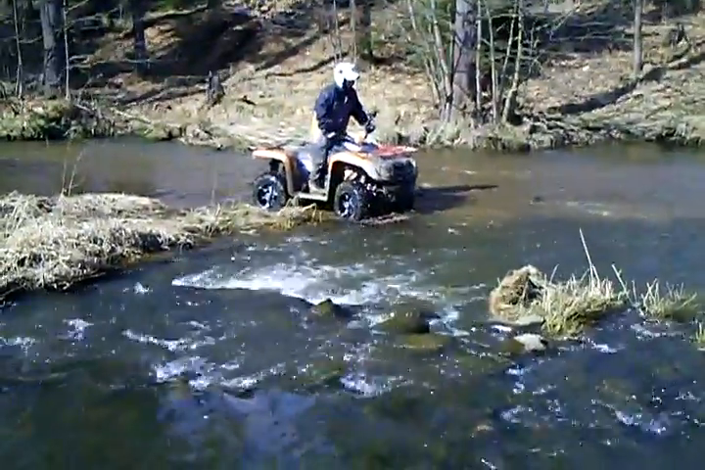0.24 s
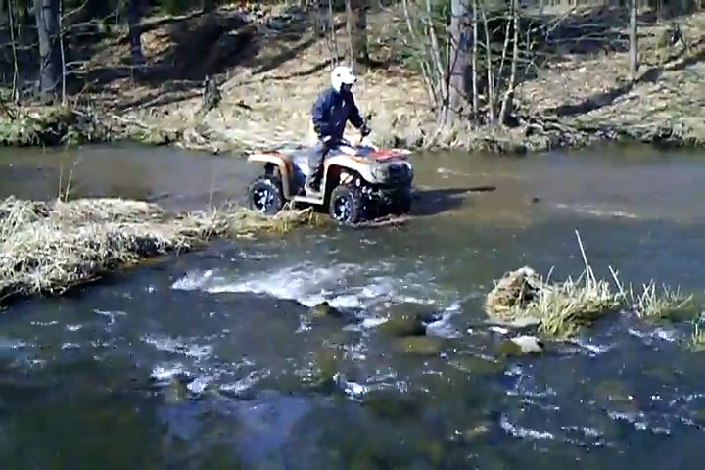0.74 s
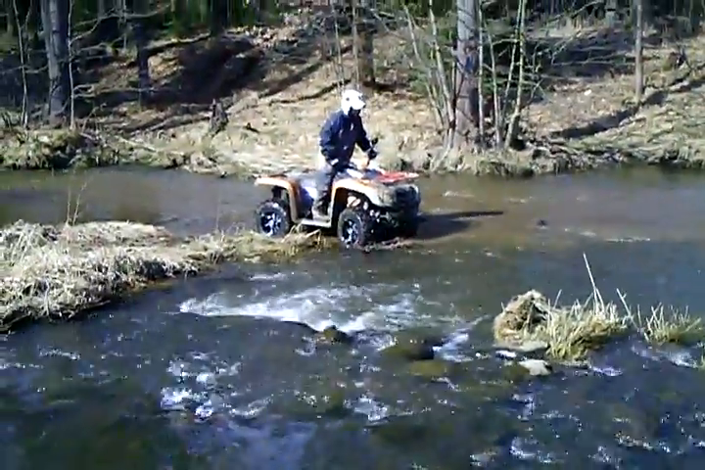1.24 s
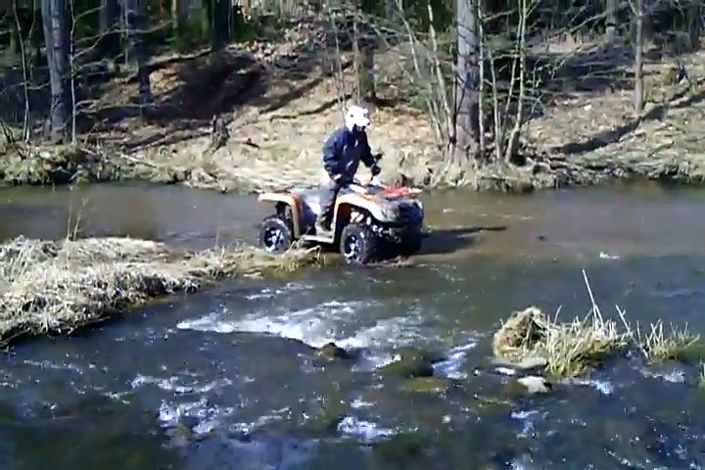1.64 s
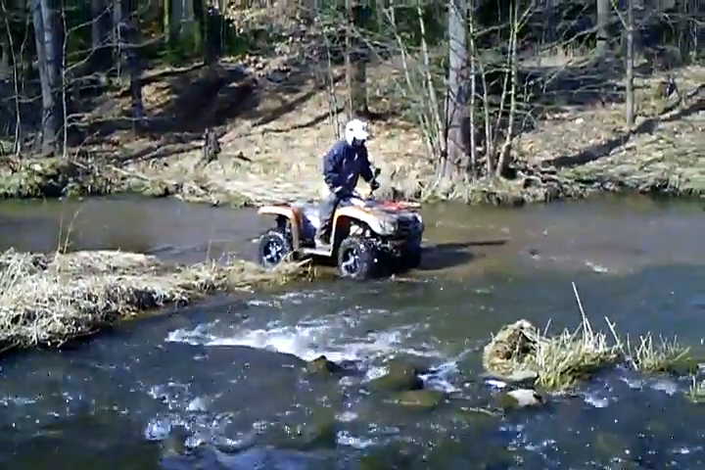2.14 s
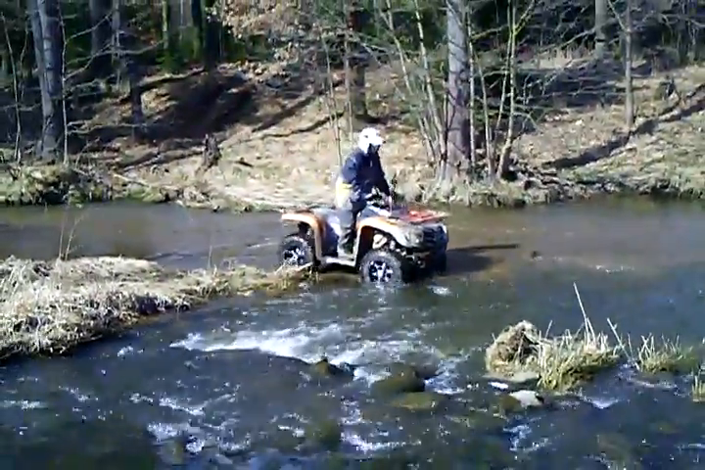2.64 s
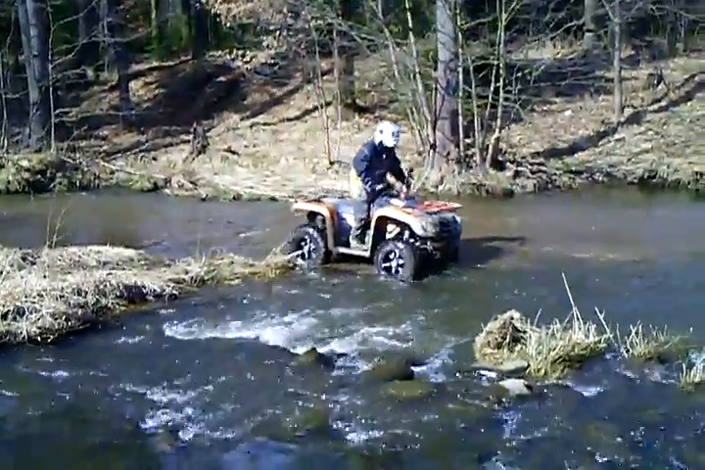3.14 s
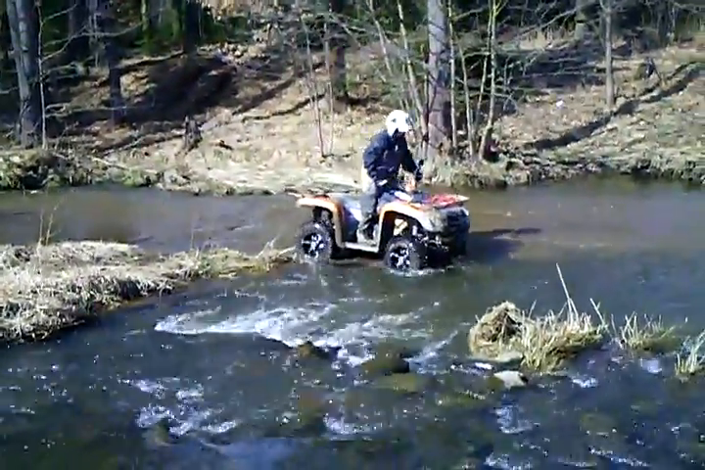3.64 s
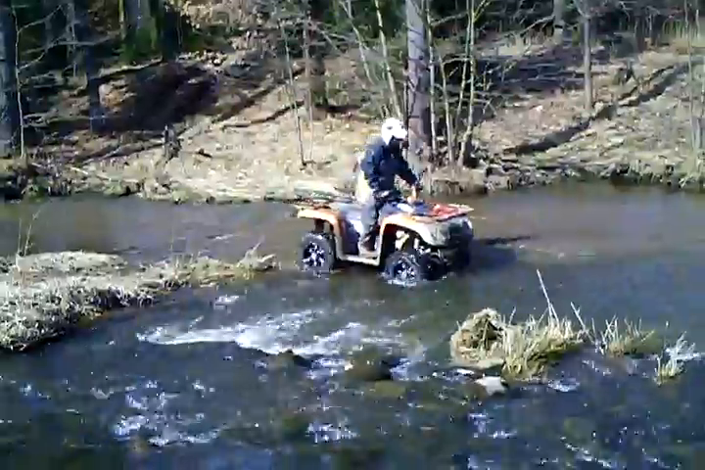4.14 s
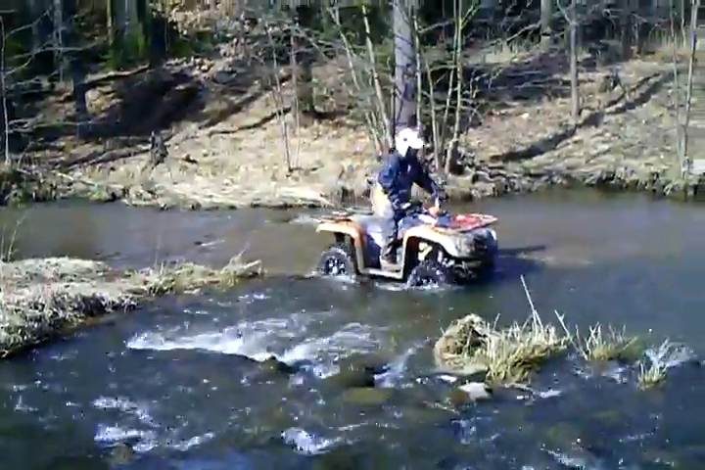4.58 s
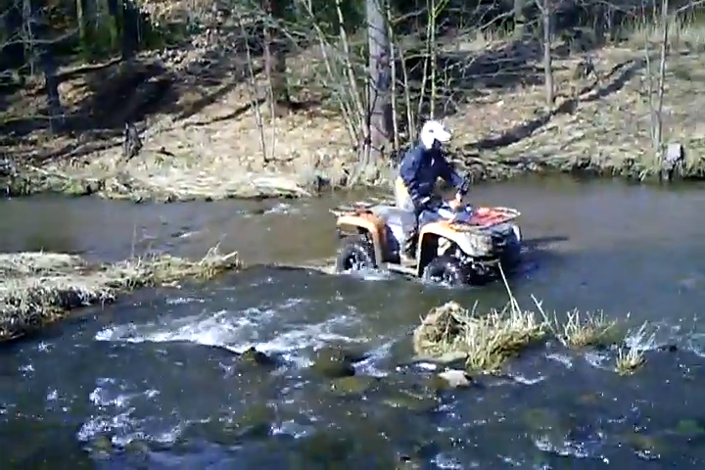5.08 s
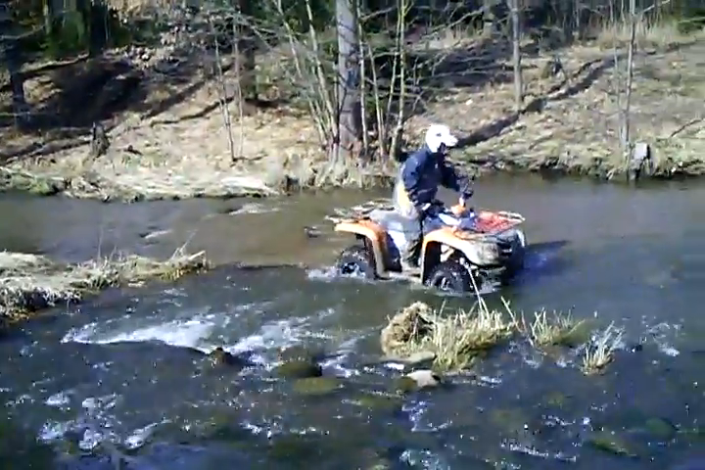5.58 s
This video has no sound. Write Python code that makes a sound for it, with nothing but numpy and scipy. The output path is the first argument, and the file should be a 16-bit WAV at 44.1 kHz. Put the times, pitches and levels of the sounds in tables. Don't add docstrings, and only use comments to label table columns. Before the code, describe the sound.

Continuous shallow-water rush, fizz and plinking bubbles. Low, separate engine thumps from two waiting quads beat against each other near the microphone, with faint ticks. The crossing quad barks through two throttle pulls with casing clatter, dropping to idle between them, then snaps open at the end. Midway, a farther engine revs freely twice, its firings merging into a hollow rising and falling hum. Open air, dry, small mono camera sound.

```python
import sys
import numpy as np
from scipy import signal
from scipy.fft import rfft, irfft
from scipy.io import wavfile
from scipy.ndimage import uniform_filter1d, map_coordinates

SR = 44100
rng = np.random.default_rng(int(sys.argv[2]) if len(sys.argv) > 2 else 0)


def put_to_file(sound):
    columns = np.atleast_2d(sound).T
    safe = np.clip(columns, -1, 1)
    whole_steps = np.round(safe * 32767)
    wavfile.write(sys.argv[1], SR, whole_steps.astype(np.int16))


def ratio(d):
    e = np.asarray(d, float) / 20
    return 10 ** e


N = 256320

# [freq_hz, level_db]
RIFFLE_BODY_SPECTRUM = [(120, -120), (260, -3), (340, -1), (480, -4), (700, -1.5), (1000, -5.5),
                        (1600, -6.5), (2600, -7.5), (4000, -19), (7000, -120)]
RIFFLE_FIZZ_SPECTRUM = [(1500, -120), (3000, -2.5), (4200, 0), (6800, -1), (9800, 1), (10500, -2.5),
                        (12100, -8), (14000, -120)]
# [start_s, peak_db, pitch_hz]
DROPLETS = [(0.7023, -26.5, 6130), (1.1109, -33, 5300), (1.2989, -38, 6000), (1.9889, -32, 6270),
            (2.2702, -31, 4000), (2.6828, -32, 6200), (2.749, -35, 5560), (3.0315, -32, 6130),
            (3.2279, -53, 3800), (3.465, -23, 7250), (3.683, -21, 8300), (4.1749, -35, 7240),
            (4.31, -28, 6300), (4.653, -32, 6090), (5.243, -30, 4080), (5.776, -28, 3890)]

# [top_s, top_firings_per_s, climb_per_s2, fall_per_s2]
REVVER_BLIPS = [
    (2.339, 34.678, 20.654, 49.396),
    (2.909, 36.292, 50.177, 38.846),
]
# [full_voice_db, throttle_shut_change_db]
REVVER_BLIP_LEVELS = [(-32.5, -3.5), (-29, -1)]
# [freq_hz, signed_strength, t60_s]
REVVER_MODES = [(35, -.13, .1), (104, .5, .08), (144, 1, .062), (212, .11, .09)]
# [freq_hz, level_db]
INTAKE_SPECTRUM = [(300, -120), (580, -2), (750, 3), (950, -6), (1600, -13), (2300, -0.5), (3000, -14.5),
                   (9500, -21.5), (12500, -120)]

# [time_s, firings_per_s]
SLOW_IDLE_RATE = [(0, 11.553), (.39, 11.163), (.74, 11.828), (2.05, 11.479), (2.74, 11.517), (4.49, 11.863),
                  (4.65, 11.509), (4.99, 12.067), (5.82, 10.883)]
FAST_IDLE_RATE = [(0, 13.098), (.42, 13.107), (.6, 12.899), (2.06, 13.344), (2.41, 13.076), (3.2, 13.662),
                  (3.76, 13.057), (4.96, 13.654), (5.82, 13.063)]
CROSSER_RATE = [(0, 11.067), (.731, 11.481), (1.501, 17.558), (2.477, 17.639), (3.26, 12.615),
                (3.414, 12.35), (3.95, 18.476), (4.366, 18.328), (4.687, 19.775), (5.169, 13.356),
                (5.433, 12.775), (5.82, 17.408)]
FIRST_FIRING_CYCLES = (.985, .589, .066, .532)
# [freq_hz, signed_strength, t60_s]
SLOW_IDLER_MODES = [(50, -.45, .095), (87, 2, .03), (106.5, -.41, .128), (136, -.6, .04), (264, .03, .1)]
FAST_IDLER_MODES = [(58.7, -.56, .081), (102.5, 1.22, .044), (131, -.18, .1), (200, -.03, .09)]
# [freq_hz, level_db]
SHAKE_SPECTRUM = [(10, -30), (25, -3), (60, -2), (110, 0), (145, -12), (230, -16), (320, -24), (500, -40),
                  (900, -120)]
CHUFF_SPECTRUM = [(90, -120), (200, -6), (310, 0), (430, -8), (560, -30), (900, -120)]
TICK_SPECTRUM = [(1500, -120), (3500, 5), (6200, 26), (10000, 20), (12500, -120)]

# [fully_open_s, shut_s, load_db, opening_db_per_s]
THROTTLE_PULLS = [
    (1.292, 2.703, 4, 31),
    (3.723, 4.708, 4, 41),
    (5.71, 6, 5, 105),
]
# [freq_hz, signed_strength, t60_s]
SILENCER_MODES = [(64, -.08, .077), (102.4, .49, .086), (139, .2, .065)]
PIPE_MODES = [(174.1, 0.62, 0.057), (213.8, -0.015, 0.16), (266.7, 0.12, 0.074), (315, 0.072, 0.063)]
# [freq_hz, level_db]
CLATTER_SPECTRUM = [(200, -120), (450, 4), (720, 1), (1300, -5.5), (2300, -1), (3300, -5.5), (6000, -11.5),
                    (11000, -18.5), (13000, -120)]
# [freq_hz, gain_db]
MICROPHONE_RESPONSE = [(10, -0.5), (1300, 2.5), (1500, -2.5), (2000, -3), (3050, -1.5), (3350, -7),
                       (3900, -3), (10400, -1), (12300, -15.5)]


def unit(x):
    return x / np.sqrt(np.mean(x ** 2) + 1e-20)


def rate_curve(rows):
    time_s, rate = np.transpose(rows)
    return np.interp(np.arange(N) / SR, time_s, rate)


def wobble(knots_per_s):
    knots = rng.standard_normal(int(N * knots_per_s / SR) + 4)
    return map_coordinates(knots, [np.arange(N) * knots_per_s / SR])


def coloured(x, spectrum):
    freq_hz, level_db = np.transpose(spectrum)
    bin_hz = np.fft.rfftfreq(N, 1 / SR)
    gain_db = np.interp(np.log(bin_hz + 1), np.log(freq_hz + 1), level_db)
    return irfft(rfft(x) * ratio(gain_db), N)


def rush(spectrum, patchy_db):
    z = signal.stft(rng.standard_normal(N + 512), nperseg=512)[2]
    patches = uniform_filter1d(rng.standard_normal(z.shape), size=5, axis=0)
    patches = uniform_filter1d(patches, size=5, axis=1)
    noise = signal.istft(z * ratio(patchy_db * unit(patches)), nperseg=512)[1][:N]
    return unit(coloured(noise, spectrum))


def cycles(rate, first_cycles):
    return np.cumsum(rate) / SR - first_cycles


def gate(turns, shift_cycles, sharp):
    return unit(np.exp(sharp * (np.cos(2 * np.pi * (turns - shift_cycles)) - 1)))


def exhaust(turns, modes, lead_s, rise_s, scatter_db):
    edge = np.arange(1, SR // 4 + 1)
    step = np.diff(turns)
    before = turns[0] - step[0] * edge[::-1]
    after = turns[-1] + step[-1] * edge
    running = np.r_[before, turns, after]
    fired = np.flatnonzero(np.diff(np.floor(running)) > 0)
    scatter = scatter_db * rng.standard_normal((N // 1000, len(modes) + 1))[:len(fired)]
    t = (edge - 1) / SR
    start = len(edge) + int(lead_s * SR)
    out = np.zeros(N)
    for k, (hz, strength, t60_s) in enumerate(modes):
        blows = np.zeros(len(running))
        blows[fired] = ratio(scatter[:, k] / 2 + scatter[:, -1])
        swell = 1 - np.exp(-t / rise_s)
        ring = strength * ratio(-60 * t / t60_s) * np.sin(2 * np.pi * hz * t) * swell
        out += signal.fftconvolve(blows, ring)[start:][:N]
    return unit(out)


def load():
    sag_db_per_s, shuts_db_per_s, idle_db = 1, 40, -15
    overrun_db, overrun_fades_db_per_s = -1.5, 24
    t = np.arange(N) / SR
    pulls = []
    for full_s, shut_s, load_db, opens_db_per_s in THROTTLE_PULLS:
        held = np.minimum(opens_db_per_s * (t - full_s), sag_db_per_s * (full_s - t))
        since_shut_s = t - shut_s
        overrun = overrun_db - overrun_fades_db_per_s * since_shut_s
        drop = np.minimum(0, np.maximum(-shuts_db_per_s * since_shut_s, overrun))
        pulls.append(load_db + held + drop * (t > shut_s))
    return np.maximum(np.max(pulls, axis=0), idle_db)


def bubbles(start_s, hz, size, lives):
    t = np.arange(SR // 60) / SR
    age = t * (hz / lives)[:, None]
    tone = np.sin(2 * np.pi * hz[:, None] * t * (1 + 0.127 * age))
    drops = size[:, None] * tone * np.exp(-age) * (1 - np.exp(-8 * age))
    at = (start_s * SR).astype(int)[:, None] + np.arange(len(t))
    return np.bincount(at.ravel(), drops.ravel(), N + SR)[:N]


def stream(count=1500):
    rises_db_per_s, wash_db = 0.28, 0.92
    flow_db = rises_db_per_s * np.arange(N) / SR + wash_db * uniform_filter1d(ratio(load()), SR // 3)
    surge = wobble(9)
    body_db = -43 + flow_db + .5 * surge
    fizz_db = -49.5 + 0.65 * flow_db + 0.49 * surge + 0.38 * wobble(35)
    body = ratio(body_db) * rush(RIFFLE_BODY_SPECTRUM, patchy_db=0.5)
    fizz = ratio(fizz_db) * rush(RIFFLE_FIZZ_SPECTRUM, patchy_db=1.0)
    when, pitch, size = rng.random((count, 3)).T
    swarm = bubbles(when * N / SR, 900 * 11 ** pitch, ratio(16 * size), lives=7)
    start_s, peak_db, pitch_hz = np.transpose(DROPLETS)
    droplets = bubbles(start_s, pitch_hz, ratio(peak_db - 6.5), lives=5.8)
    return body + fizz + ratio(-51.5) * unit(swarm) + droplets


def blips():
    idle_rate, full_voice_rate, fades_db_per_rate = 15, 29.3, 1.5
    t = np.arange(N) / SR
    lag = int(.1 * SR)
    tents = np.array([top - np.maximum(climb * (top_s - t), fall * (t - top_s))
                      for top_s, top, climb, fall in REVVER_BLIPS])
    rate = uniform_filter1d(np.maximum(tents.max(axis=0), idle_rate), lag, mode="nearest")
    open_db, shut_db = np.array(REVVER_BLIP_LEVELS)[tents.argmax(axis=0)].T
    voice_db = uniform_filter1d(open_db + shut_db * (np.gradient(rate) <= 0), lag)
    return rate, voice_db - fades_db_per_rate * np.maximum(full_voice_rate - rate, 0)


def revver():
    rate, level_db = blips()
    turns = cycles(rate, FIRST_FIRING_CYCLES[3])
    note = exhaust(turns, REVVER_MODES, lead_s=.01, rise_s=.02, scatter_db=.7)
    climb_per_s2 = uniform_filter1d(np.gradient(rate) * SR, SR // 10)
    throttle = np.clip(climb_per_s2 / 20, 0, 1)
    puffs = unit(1 + .5 * gate(turns, 0.038, sharp=2.3))
    roar = puffs * rush(INTAKE_SPECTRUM, patchy_db=0.5)
    return ratio(level_db) * (note + ratio(-18 + 6.5 * throttle) * roar)


def idlers():
    slow = cycles(rate_curve(SLOW_IDLE_RATE), FIRST_FIRING_CYCLES[0])
    fast = cycles(rate_curve(FAST_IDLE_RATE), FIRST_FIRING_CYCLES[1])
    slow_thump = exhaust(slow, SLOW_IDLER_MODES, lead_s=.016, rise_s=.043, scatter_db=.8)
    fast_thump = exhaust(fast, FAST_IDLER_MODES, lead_s=.013, rise_s=.05, scatter_db=.8)
    thumps = ratio(-30.5) * slow_thump + ratio(-31.0) * fast_thump
    puffs = gate(slow, .03, sharp=12) + .5 * gate(fast, .03, sharp=9)
    chuff = ratio(-50) * unit(puffs) * rush(CHUFF_SPECTRUM, patchy_db=2.5)
    slow_valves = gate(slow, 0.03, sharp=13) + 0.15 * gate(2 * slow, 0.05, sharp=8.9)
    valves = slow_valves + .5 * gate(fast, 0.021, sharp=28)
    ticks = ratio(-59.5 + 2.3 * wobble(14)) * unit(valves) * rush(TICK_SPECTRUM, patchy_db=3.5)
    shake = ratio(-37) * rush(SHAKE_SPECTRUM, patchy_db=1.5)
    return thumps + chuff + ticks + shake


def crosser_exhaust(turns, modes, heat):
    hot_ratio = 1.05
    hot_modes = np.multiply(modes, (hot_ratio, 1, 1.25))
    cool = exhaust(turns, modes, lead_s=.014, rise_s=.05, scatter_db=.7)
    hot = exhaust(turns, hot_modes, lead_s=.014 / hot_ratio, rise_s=.05, scatter_db=.7)
    return (1 - heat) * cool + heat * hot


def crosser():
    rate = rate_curve(CROSSER_RATE)
    turns = cycles(rate, FIRST_FIRING_CYCLES[2])
    load_db = load()
    heat = np.clip((rate - 17.6) / 1.2, 0, 1)
    thud = crosser_exhaust(turns, SILENCER_MODES, heat)
    bark = crosser_exhaust(turns, PIPE_MODES, heat)
    rattle = unit(1 + .5 * gate(turns, 0.045, sharp=4.3))
    clatter = rattle * rush(CLATTER_SPECTRUM, patchy_db=1.7)
    exhausts = ratio(-39.5 + 1.9 * load_db) * thud + ratio(-37.5 + load_db) * bark
    return exhausts + ratio(-47.5 + 0.42 * load_db) * clatter


def scene():
    return (stream() + revver() + idlers() + crosser())[None]


def low_pass(x):
    return signal.sosfilt(signal.butter(12, 12230, fs=SR, output="sos"), x)


def record(dry):
    x = coloured(dry, MICROPHONE_RESPONSE)
    rounded = x / (1 + np.abs(x / .36) ** 4) ** (1 / 4)
    return low_pass(rounded)


dry = scene()
out = record(dry)
put_to_file(out)
```